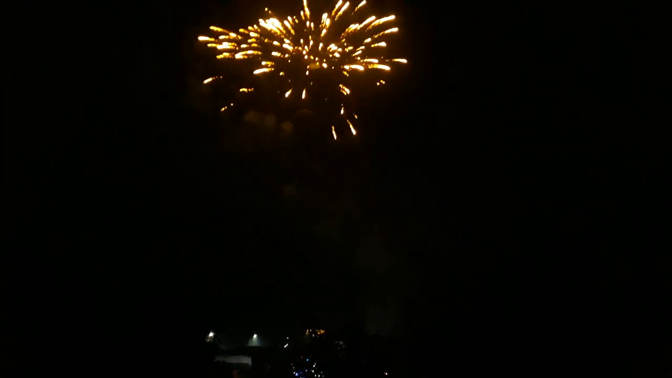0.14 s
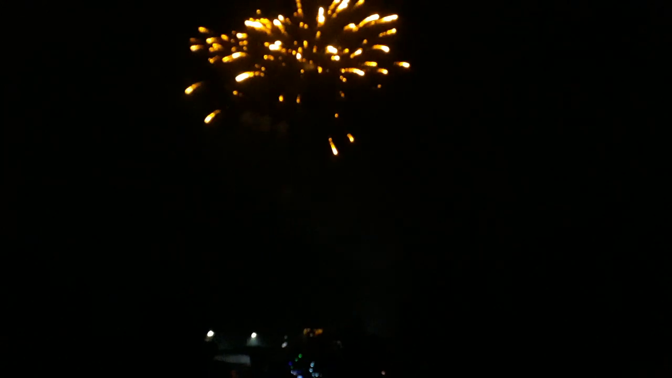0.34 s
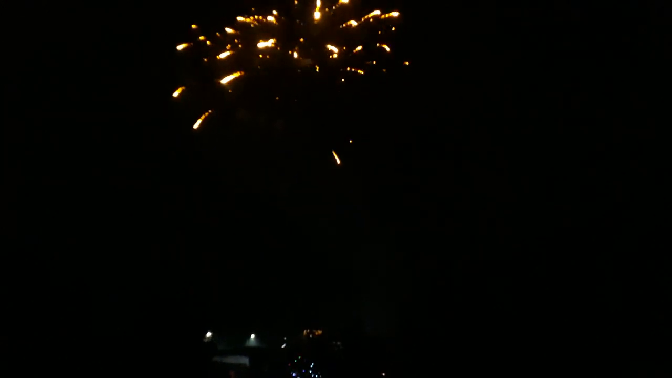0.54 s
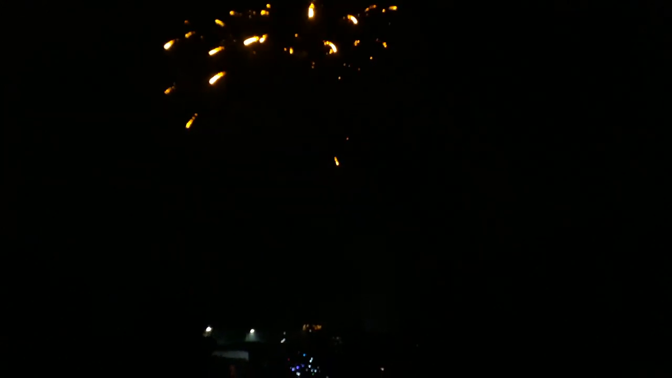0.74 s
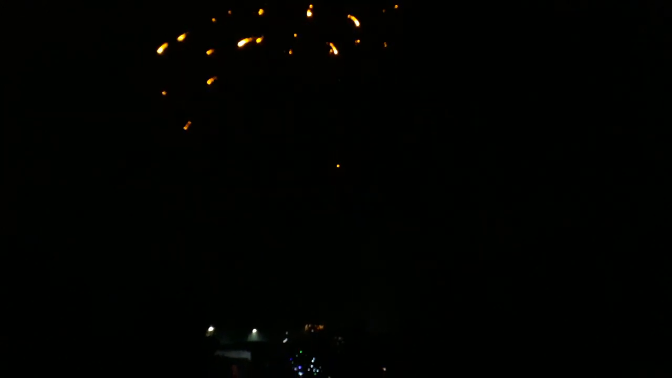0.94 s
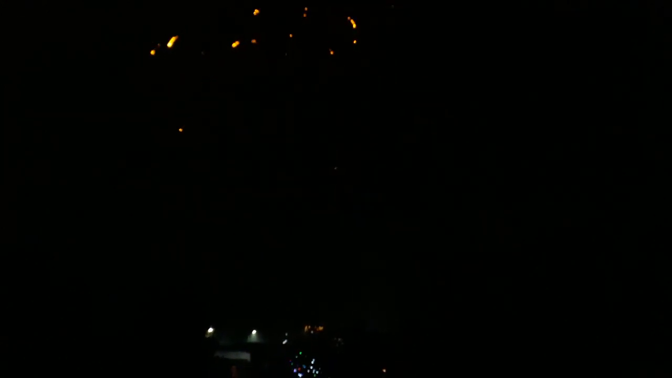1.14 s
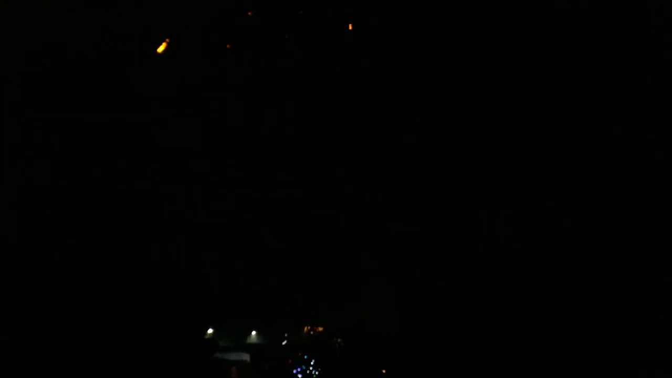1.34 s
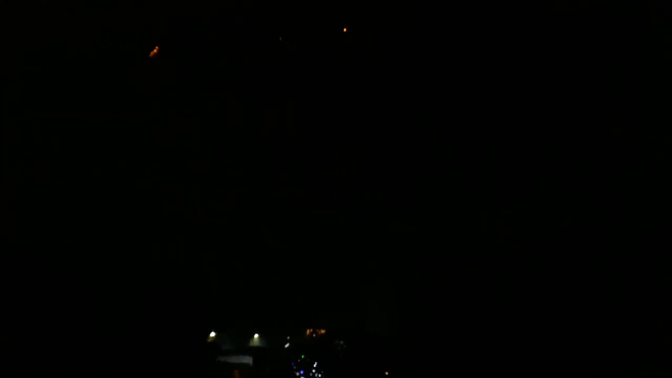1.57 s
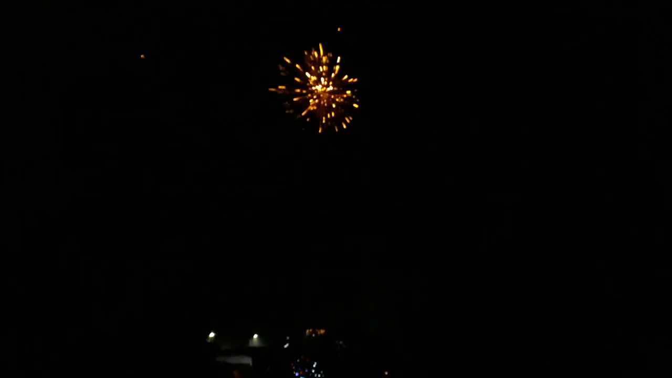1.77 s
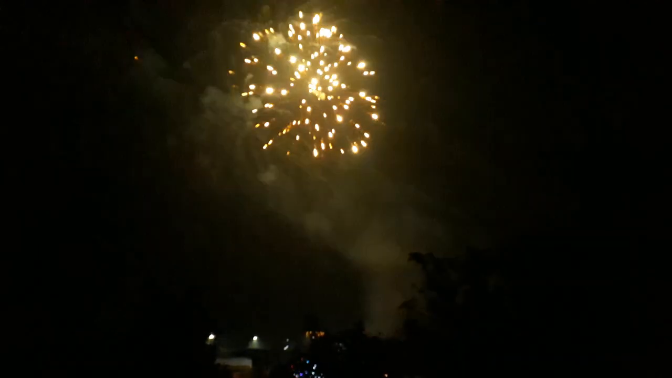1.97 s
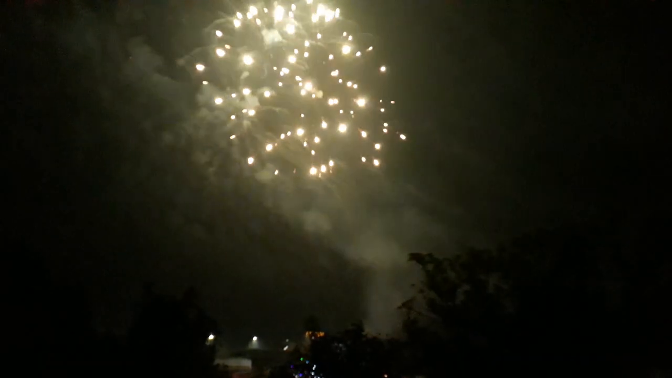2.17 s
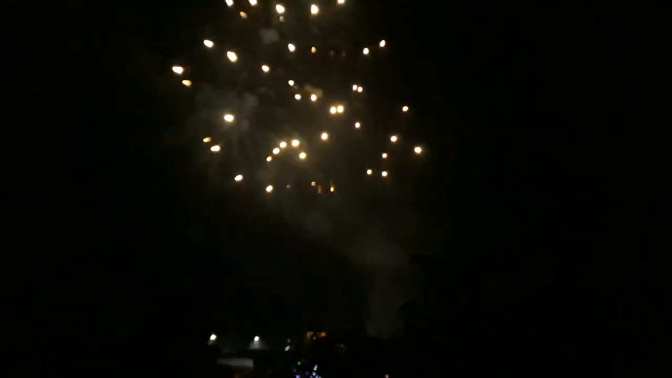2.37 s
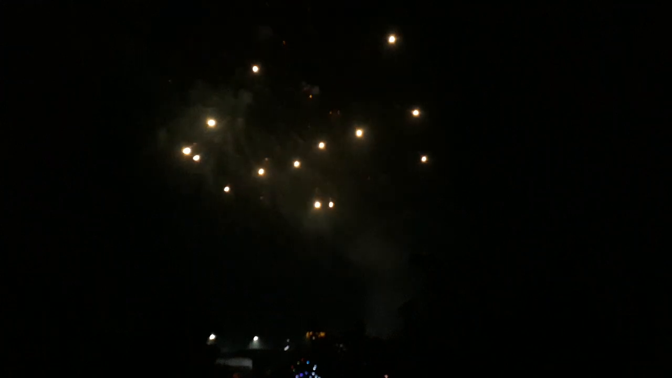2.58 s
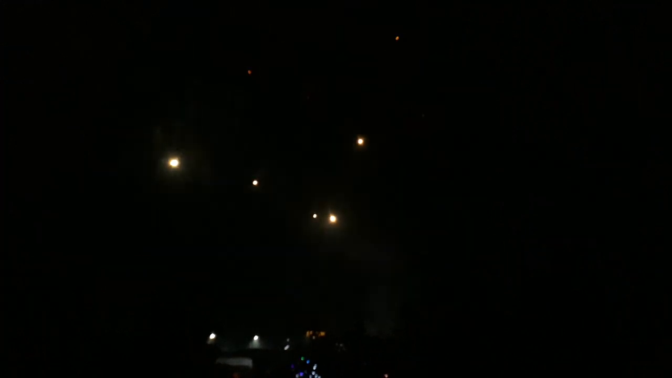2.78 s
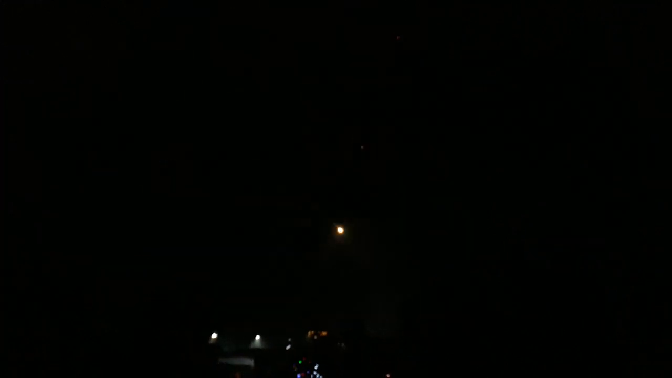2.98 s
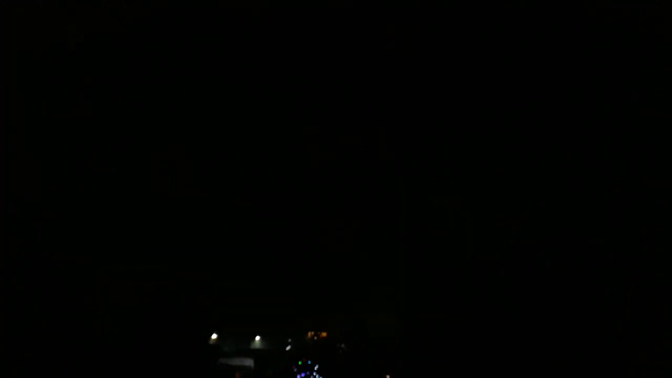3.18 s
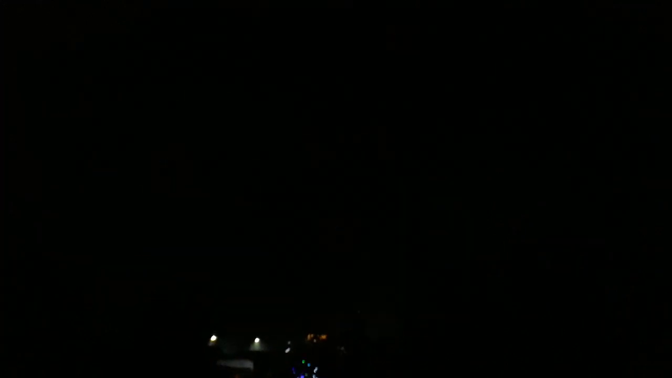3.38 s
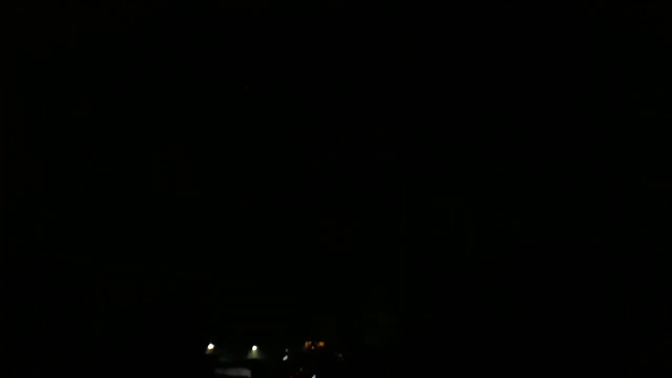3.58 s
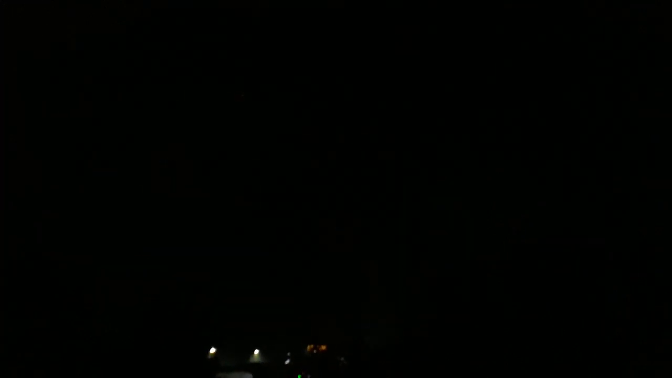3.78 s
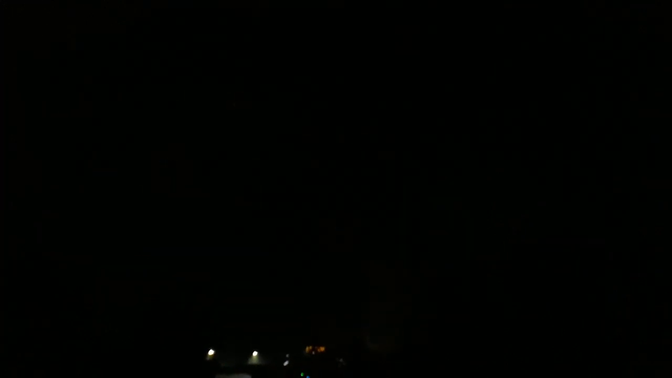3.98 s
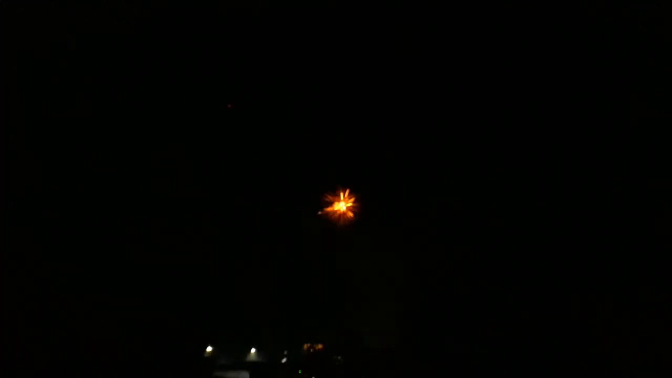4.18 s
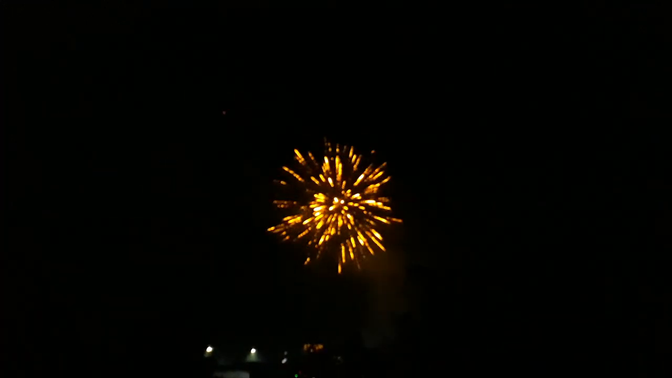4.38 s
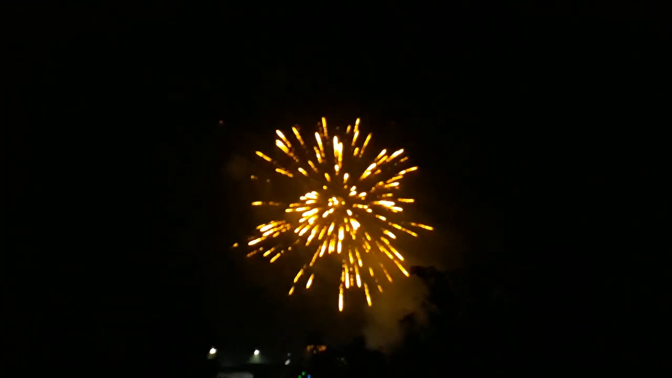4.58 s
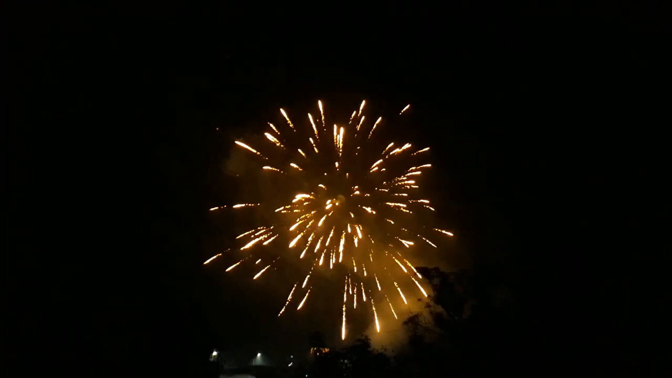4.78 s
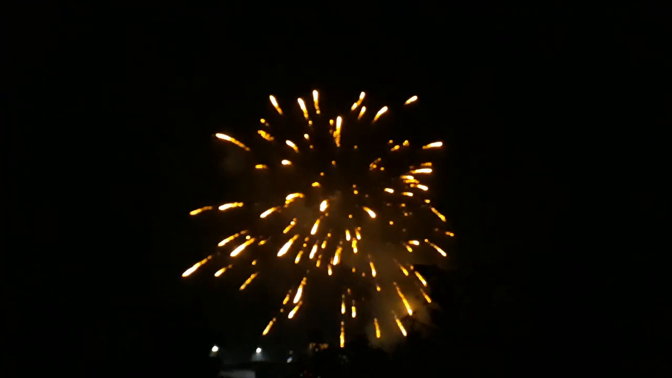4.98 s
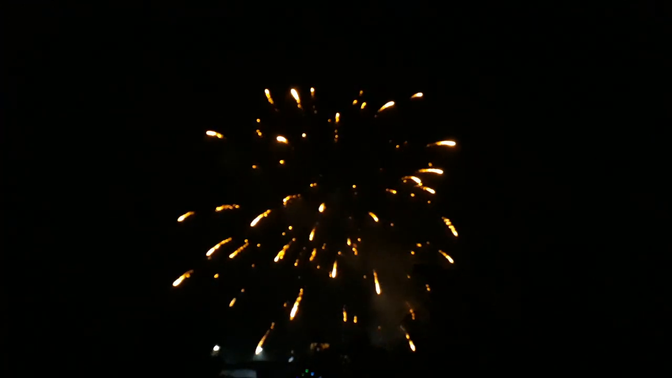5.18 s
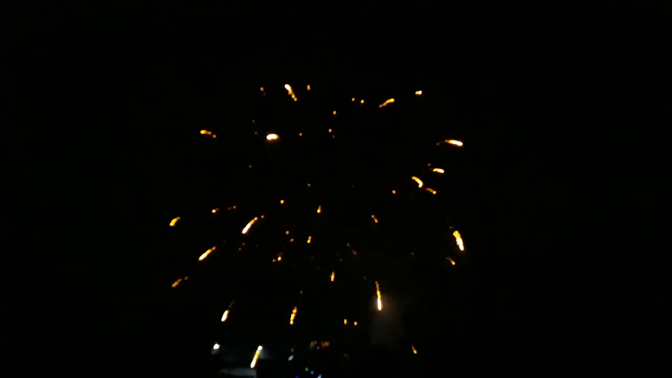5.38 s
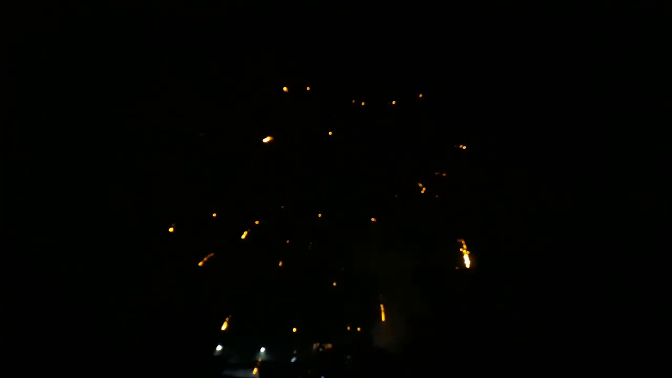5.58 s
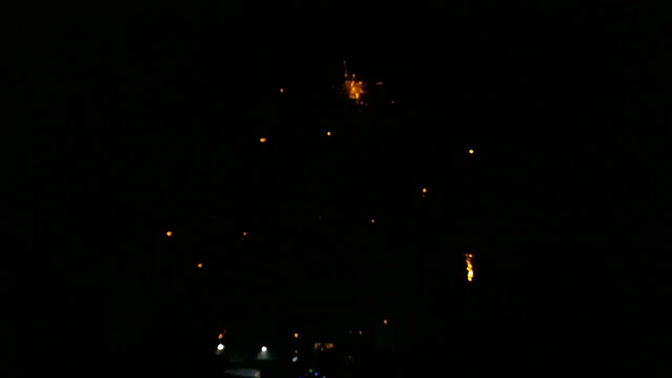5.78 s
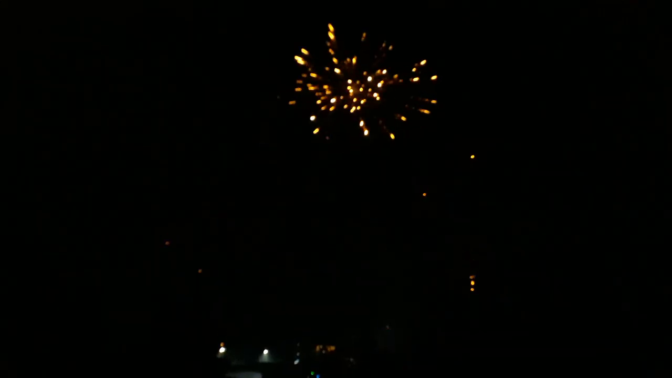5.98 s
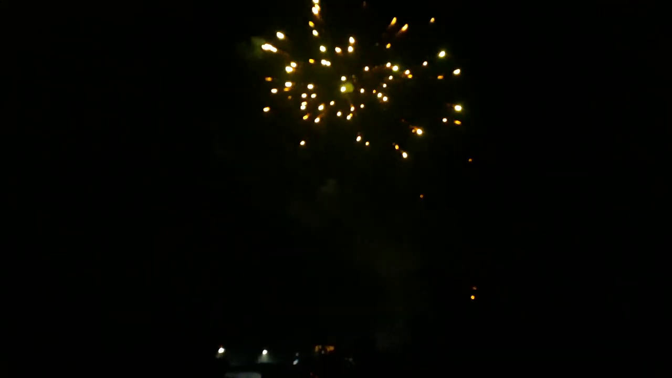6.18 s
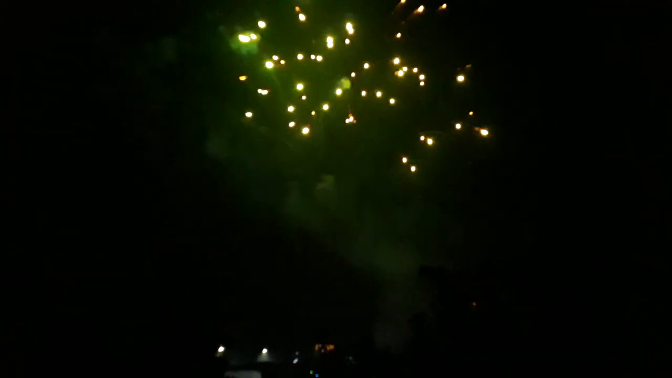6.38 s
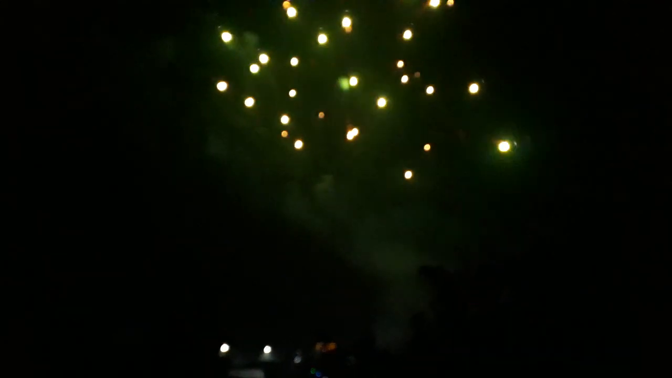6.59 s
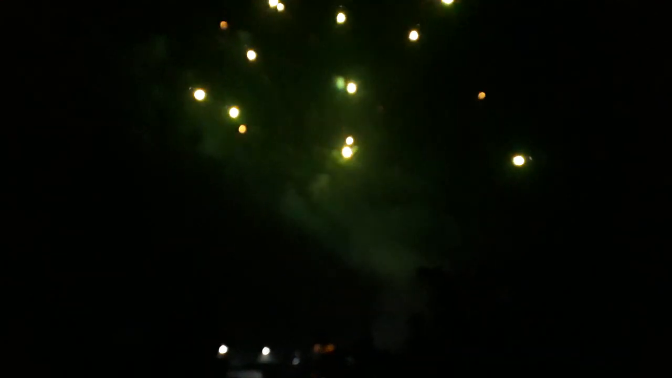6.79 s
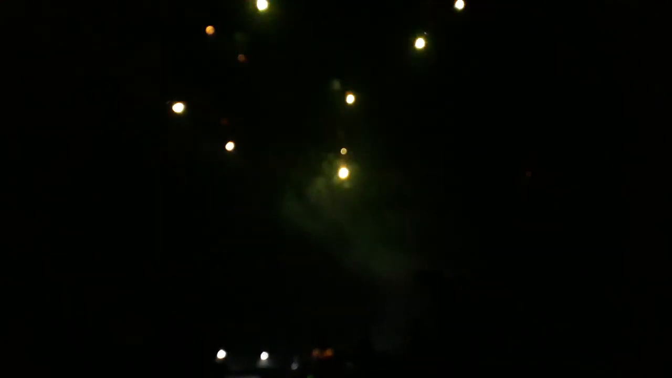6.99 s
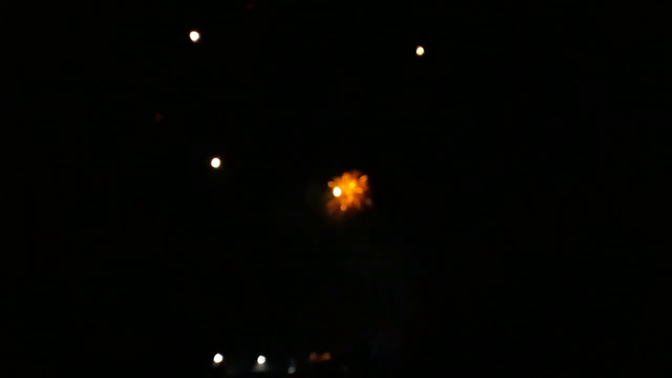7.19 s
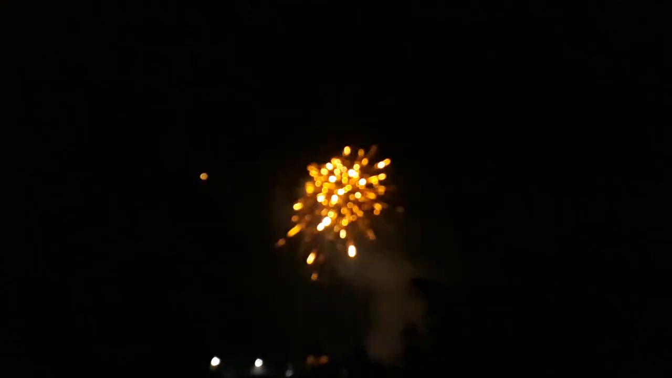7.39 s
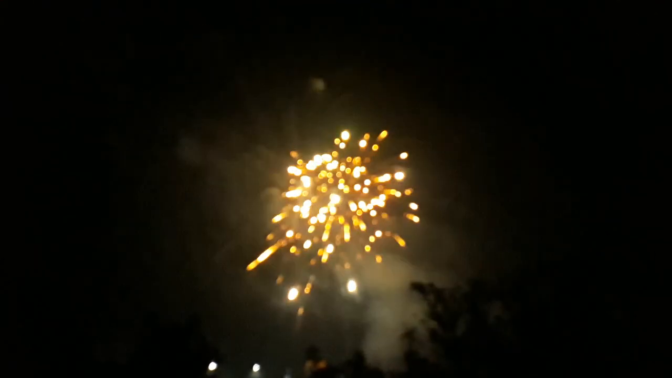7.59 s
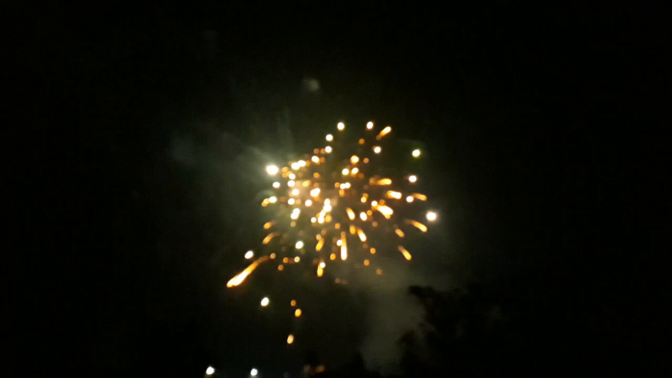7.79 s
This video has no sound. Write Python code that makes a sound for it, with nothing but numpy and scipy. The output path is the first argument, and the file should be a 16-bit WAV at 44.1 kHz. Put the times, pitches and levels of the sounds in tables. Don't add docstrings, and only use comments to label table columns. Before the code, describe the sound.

After an earlier shell's tail and returning echo, a heavy, deep explosion hits, followed by three shorter, snappier ones, the last somewhat weaker with strong nearby slaps. All overload the phone microphone. Between them the town answers with rolling, darkening reverberation and dull knocks; burning stars pop faintly, launch charges thump quietly, and a short dull spray of sparks fizzes after the third bang.

```python
import sys
import numpy as np
from scipy import signal
from scipy.fft import rfft, irfft
from scipy.io import wavfile
from scipy.ndimage import uniform_filter1d

SR = 44100
rng = np.random.default_rng(int(sys.argv[2]) if len(sys.argv) > 2 else 0)


def ratio_of_db(decibels):
    return 10 ** (np.asarray(decibels, float) / 20)


def master_out(mix):
    frames = np.transpose(np.atleast_2d(mix))
    ceiling = np.clip(frames, -1, 1)
    pcm = np.round(ceiling * 32767).astype(np.int16)
    wavfile.write(sys.argv[1], SR, pcm)


N = 345303

# (time [s], pressure level [dB], fading time [ms], ground bounce delay [ms],
# ground bounce level [dB], deep boom level [dB])
BURSTS = [
    (1.8461, 12, 6.2, 5.1, -13.5, -6.5),
    (4.355, 11.5, 1.4, 4.33, -8, -26),
    (5.9001, 12.5, 1.1, 5.0, -4.5, -16),
    (7.3126, 8.5, 0.96, 4.1, -8, -17),
]
# (time [s], peak level [dB], shock length [ms])
LIFTS = [
    (4.0961, -13.5, 1.3),
    (4.1578, -12.5, 1.5),
    (5.7650, -13, 0.62),
]
# (near echoes [dB], far echoes [dB], extra far path [s], far brightness [dB])
ANSWERS = [
    (.1, 0.2, .0, -1),
    (.1, -0.32, 0.0019, 0.3),
    (.6, -0.7, .017, 2.1),
    (.8, -0.5, .012, 3),
    (2.5, -2, .01, 3),
]
EARLIER_BURST_S = -.328
FIZZ_S, FIZZ_RISE_FALL = 6.28, (260, 41)


def band(x, hz, width):
    return signal.lfilter(*signal.iirpeak(hz, hz / width, fs=SR), x)


def add(out, s, x):
    i = int(s * SR)
    out[i:i + len(x)] += x[:N - i]


def unit(x):
    return x / np.max(np.abs(x))


def flicker(rate):
    hold = int(SR / rate)
    steps = np.repeat(rng.standard_normal(N // hold + 1), hold)
    return 0.82 * uniform_filter1d(steps, hold)[:N]


def since_burst(t):
    return np.min([np.where(t >= b[0], t - b[0], np.inf) for b in BURSTS], axis=0)


def shots():
    return [EARLIER_BURST_S] + [b[0] for b in BURSTS]


def bursts(debris_db=7, debris_ms=4, debris_hz=2500, spit_db=4, bounce_edge_db=6, boom_hz=60):
    shocks, rest = np.zeros(N), np.zeros(N)
    t_ms = np.arange(2048) / SR * 1000
    for s, db, fade_ms, late_ms, late_db, boom_db in BURSTS:
        bounce_s = s + late_ms / 1000
        add(shocks, s, -ratio_of_db(db) * blast(1.45, fade_ms))
        add(shocks, bounce_s, ratio_of_db(db + late_db) * blast(3.2, fade_ms))
        debris = band(rng.standard_normal(2048), debris_hz, 3000) * np.exp(-t_ms / debris_ms)
        add(rest, s, ratio_of_db(debris_db) * debris / 2.2)
        spit = .5 + np.sin(2 * np.pi * 6.0 * t_ms[:15])
        add(rest, s - .00033, ratio_of_db(spit_db) * spit)
        bounce_edge = np.sin(2 * np.pi * 5.0 * t_ms[:18])
        add(rest, bounce_s, ratio_of_db(spit_db + late_db + bounce_edge_db) * bounce_edge)
        boom = np.sin(2 * np.pi * boom_hz * t_ms / 1000) * np.exp(-t_ms / 9)
        add(rest, s, ratio_of_db(boom_db) * boom)
    return capsule(shocks) + rest


def blast(push_ms, fade_ms):
    t_ms = np.arange(2048) / SR * 1000
    return (1 - t_ms / push_ms) * np.exp(-t_ms / fade_ms)


def capsule(x, cut_hz=230, cut_q=1.64):
    w = 2 * np.pi * cut_hz
    return port(signal.lfilter(*signal.bilinear([1, 0, 0], [1, w / cut_q, w * w], fs=SR), x))


def port(x):
    # (pitch [Hz], width [Hz], level [dB])
    resonances = [
        (2350, 900, -2),
        (7800, 2500, -2),
    ]
    return x + sum(ratio_of_db(db) * band(x, hz, width) for hz, width, db in resonances)


def slaps(below_db=-1, edge_db=-13):
    out = np.zeros(N)
    t_ms = np.arange(600) / SR * 1000
    for s, db, hz, crack_db, smear_ms in wall_hits():
        facets = rng.standard_normal(600) ** 3 * t_ms * np.exp(-t_ms / smear_ms)
        body = unit(band(band(facets, 400, 1000), 500, 900))
        crack = unit(band(band(facets, hz, 1600), hz, 1600))
        crack = crack + ratio_of_db(edge_db) * unit(band(facets, 7500, 6600))
        gain = min(ratio_of_db(db + below_db), 1)
        add(out, s, gain * unit(body + ratio_of_db(crack_db) * crack))
    return out


def wall_hits(scatter_ms=.5, scatter_db=1):
    # (delay [ms], peak level [dB], crack pitch [Hz], crack level [dB], smear [ms])
    walls = [
        (8.41, 0.5, 1100, 2, 0.84),
        (17.32, 2.5, 1370, 0, 1.6),
        (27.64, -12, 950, 3, 0.88),
        (34.5, -23, 1800, 2.5, 0.92),
        (41.56, -3.5, 2000, 14.5, 0.62),
        (44.5, -7.5, 2250, 13, 0.36),
        (79.4, -5.5, 2500, 12, 1.3),
        (81.1, -6, 2100, 11, 1.0),
    ]
    last_wall_db = (-3.5, 3, -2.5, 4.5)
    chance = rng.standard_normal((len(BURSTS), len(walls), 2))
    hits = []
    for i, burst in enumerate(BURSTS):
        for k, (ms, db, *shape) in enumerate(walls):
            late_s = (ms + scatter_ms * chance[i, k, 0]) / 1000
            facing_db = last_wall_db[i] if k >= len(walls) - 2 else 0
            hits.append((burst[0] + late_s, db + scatter_db * chance[i, k, 1] + facing_db, *shape))
    return hits


def thuds(cycles=1.0, crack_hz=1500, late_ms=2.5):
    out = np.zeros(N)
    t = np.arange(-200, 400) / SR
    air = signal.butter(7, 3100, fs=SR, output="sos")
    for s, db, hz, crack_db in building_hits():
        bell = np.exp(-(t * hz / cycles) ** 2 * 2)
        noise = rng.standard_normal(len(t)) * bell ** 2
        crack = unit(signal.sosfilt(air, band(noise, crack_hz, 2200)))
        thud = bell * np.sin(2 * np.pi * hz * t) + ratio_of_db(crack_db) * crack
        add(out, s + late_ms / 1000 - 200 / SR, ratio_of_db(db) * thud)
    return out


def building_hits(masked_s=.25):
    # (delay [s], peak level [dB], pitch [Hz], crack level [dB])
    buildings = [
        (.903, -24.5, 600, 9.5),
        (1.102, -17.5, 600, 5),
        (1.327, -8.5, 410, -15.5),
        (1.5523, -9.5, 415, -6),
        (1.5681, -9.5, 516, -4.5),
    ]
    hits = []
    for s, answer in zip(shots(), ANSWERS):
        for late_s, db, hz, crack_db in buildings:
            arrival = s + answer[2] + late_s
            if arrival < N / SR - masked_s and since_burst(arrival) > masked_s:
                hits.append((arrival, db, hz, crack_db))
    stray_thud = (6.981, -12.5, 400, -11)
    return hits + [stray_thud]


def roll(lumps_db=(1.5, 1.2, 1.3, 1.5, 1.4), shared_db=0.53, quick_db=1.37, near_db=9.5,
         trim_db=(-.3, -.3, -1.2, -8, -.3), grain_db=1.3):
    # (pitch [Hz], level [dB per Hz])
    roll_colour = [(30, -55), (70, -23), (130, -10.5), (330, -2.5), (520, -4), (850, -9), (1400, -7),
                   (1950, -10.5), (2350, -8), (3600, -17), (5800, -29), (7800, -30), (10500, -44.5),
                   (15000, -44.5)]
    edges_hz = [20, 900, 3500, 6200, 9500, 15900]
    blend_oct = [.5, 1.2, 1.2, .5, .3, .02]
    t, out = np.arange(N) / SR, np.zeros(N)
    clumps_db = (quick_db + near_db * np.exp(-since_burst(t) / 0.018)) * flicker(220)
    uneven_db = grain_db * rng.exponential(size=N) + shared_db * flicker(40)
    fronts = rng.standard_normal(N) * ratio_of_db(uneven_db)
    hz = np.fft.rfftfreq(N, 1 / SR) + 1
    colour_hz, colour_db = np.transpose(roll_colour)
    spectrum = rfft(fronts * ratio_of_db(clumps_db))
    spectrum = spectrum * ratio_of_db(np.interp(np.log(hz), np.log(colour_hz), colour_db))
    above = [np.clip(np.log2(hz / edge) / w + .5, 0, 1) for edge, w in zip(edges_hz, blend_oct)]
    for k, db in enumerate(roll_levels(t)):
        inside = (hz > edges_hz[k]) & (hz < edges_hz[k + 1])
        rms = np.sqrt(2 * np.sum(np.abs(spectrum[inside]) ** 2)) / N
        part = irfft(spectrum * (above[k] - above[k + 1]), N) / rms
        out += part * ratio_of_db(db + trim_db[k] + lumps_db[k] * flicker(25))
    return out * build_up(t)


def roll_levels(t):
    yard_db, yard_fall = column(-11, -12.5, -19.5, -30.5), column(145, 142, 139, 200)
    street_db, street_fall = column(-29, -30, -36, -51), column(36, 32, 37.2, 48)
    hill_db, hill_fall = column(-25, -27, -40.5, -72.5), column(10.4, 12.3, 23, 25)
    hill_arrives_s, hill_rise = column(0.887, 0.851, 0.88, .87), column(155, 174, 123, 59.6)
    hill_bright_share = column(0, .3, .6, 1.502)
    trees_arrive_s, trees_rise, trees_fall = 0.71, 126, 14.4
    trees_db = column(-38, -36.5, -45, -80.5)
    lift_db, lift_fall = column(-23, -25.5, -34, -53), column(37, 44, 54, 43)
    night_db = column(-46, -51.5, -66.5, -85.5)
    fizz_db = column(-61, -33, -41.5, -79)
    sparkle_db = column(-60, -47, -55.5, -72)

    coarse = t[::16]
    power = ratio_of_db(2 * night_db) + swell(coarse, FIZZ_S, fizz_db, *FIZZ_RISE_FALL)
    power += fading(coarse, 3.558, sparkle_db, 33.5)
    for s, (near_db, far_db, longer_s, bright_db) in zip(shots(), ANSWERS):
        power += fading(coarse, s, yard_db + near_db, yard_fall)
        power += fading(coarse, s, street_db + near_db, street_fall)
        far_s = s + longer_s
        shot_hill_db = hill_db + far_db + bright_db * hill_bright_share
        power += swell(coarse, far_s + hill_arrives_s, shot_hill_db, hill_rise, hill_fall)
        power += swell(coarse, far_s + trees_arrive_s, trees_db + far_db, trees_rise, trees_fall)
    for s, db, _ in LIFTS:
        power += fading(coarse, s, lift_db + db, lift_fall)
    body, presence, treble, air = (np.interp(t, coarse, v) for v in 10 * np.log10(power))
    top = treble + 0.95 * (treble - presence + 9.3)
    return body, presence, treble, top, air


def column(*values):
    return np.array(values, float)[:, None]


def swell(t, peak_s, db, rise, fall):
    late = np.clip(t - peak_s, -2, 9)
    return 1 / (ratio_of_db(2 * (fall * late - db)) + ratio_of_db(2 * (-rise * late - db)))


def fading(t, s, db, fall):
    return (t >= s) * ratio_of_db(2 * (db - fall * np.abs(t - s)))


def build_up(t, build_ms=7):
    return 1 - np.exp(-since_burst(t) * 1000 / build_ms)


def low_hum(hz=260, width=260, db=-15, decay_ms=60):
    t = np.arange(N) / SR
    hum = band(band(rng.standard_normal(N), hz, width), hz, width)
    decay = np.exp(-since_burst(t) * 1000 / decay_ms)
    return ratio_of_db(db) * hum / np.std(hum) * decay * build_up(t)


def lifts(top_hz=2000, bounce_ms=6.1, bounce_db=-5):
    out = np.zeros(N)
    for s, db, ms in LIFTS:
        add(out, s, ratio_of_db(db) * blast(ms, 3.9))
        add(out, s + bounce_ms / 1000, ratio_of_db(db + bounce_db) * blast(ms, 0.73))
    return capsule(signal.lfilter(*signal.butter(3, top_hz, fs=SR), out))


def ticks(decay_ms=0.63):
    # (time [s], peak level [dB], pitch [Hz])
    pops = [(1.1563, -40, 2260), (1.4654, -44, 2050), (1.518, -35, 2320), (1.6212, -24, 2190),
            (1.761, -37, 3900), (3.556, -43, 7500), (3.5744, -49, 7000), (3.613, -25, 2270),
            (3.9424, -33, 2230), (4.1759, -36.5, 5000), (4.226, -37, 2240), (4.2714, -33, 5470),
            (6.251, -45, 2350), (6.3703, -16.5, 1650), (6.3712, -25, 3880), (6.3813, -27, 3800),
            (7.1424, -19, 2100)]
    out = np.zeros(N)
    t_ms = np.arange(500) / SR * 1000
    for s, db, hz in pops:
        grain = rng.standard_normal(500) * t_ms * np.exp(-t_ms / decay_ms)
        for _ in range(3):
            grain = band(grain, hz, .8 * hz)
        add(out, s, ratio_of_db(db) * unit(grain))
    return out


def fizz(hz=1380, width=860, peak_db=-32.5, grain_db=1.2):
    uneven_db = grain_db * rng.exponential(size=N) + 2.0 * flicker(60)
    sparks = rng.standard_normal(N) * ratio_of_db(uneven_db)
    sparks = band(band(sparks, hz, width), hz, width)
    power = swell(np.arange(N) / SR, FIZZ_S, peak_db, *FIZZ_RISE_FALL)
    return sparks / np.std(sparks) * np.sqrt(power)


def scene():
    echoes = slaps() + thuds() + roll() + low_hum()
    return (bursts() + echoes + lifts() + ticks() + fizz())[None]


def top_cut(x):
    return signal.sosfilt(signal.butter(12, 16600, fs=SR, output="sos"), x)


def record(dry, ceiling=1, sag=.26, sag_ms=5):
    keep = np.exp(-1000 / SR / sag_ms)
    load = signal.lfilter([1 - keep], [1, -keep], np.abs(dry) > ceiling)
    top = ceiling * (1 - sag * load)
    return top_cut(np.clip(dry, -top, top))


dry = scene()
out = record(dry)
master_out(out)
```